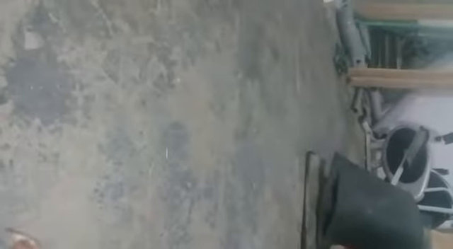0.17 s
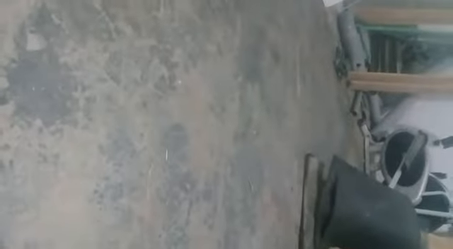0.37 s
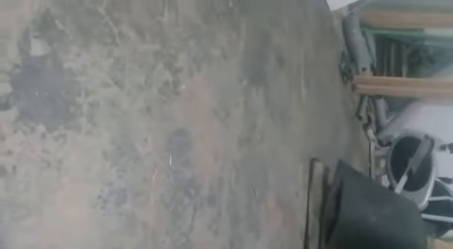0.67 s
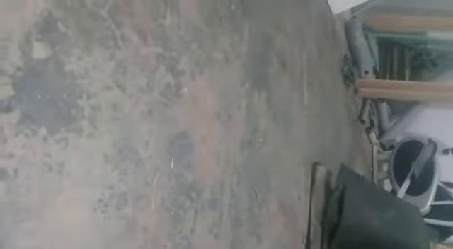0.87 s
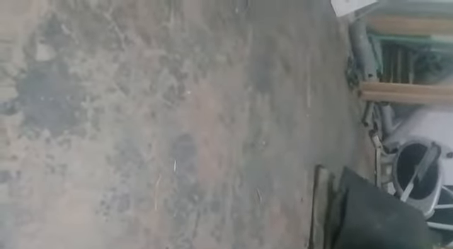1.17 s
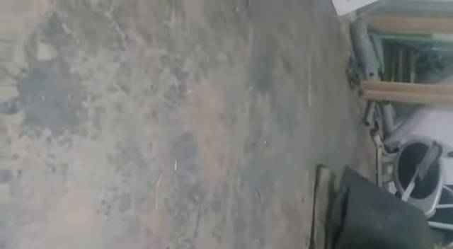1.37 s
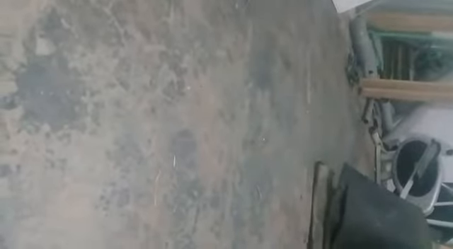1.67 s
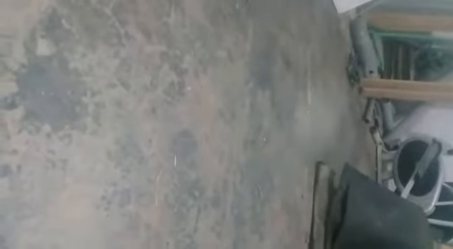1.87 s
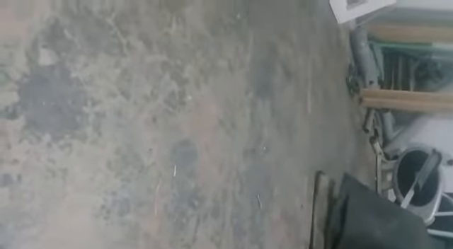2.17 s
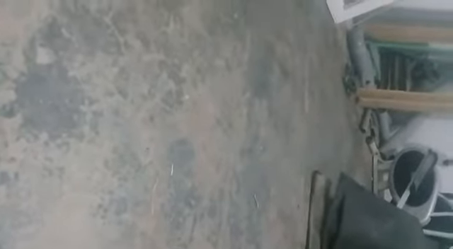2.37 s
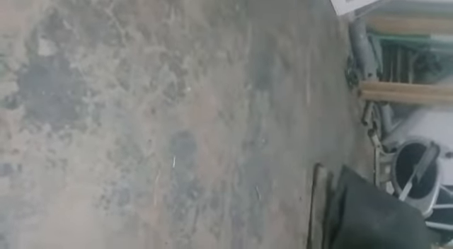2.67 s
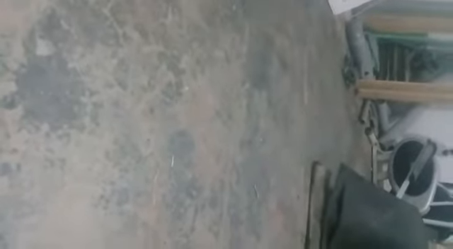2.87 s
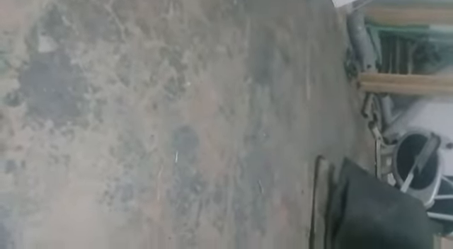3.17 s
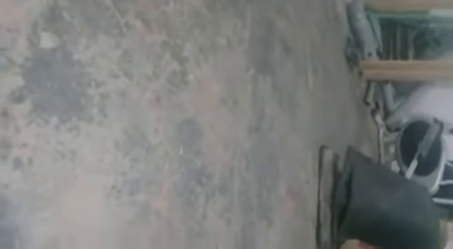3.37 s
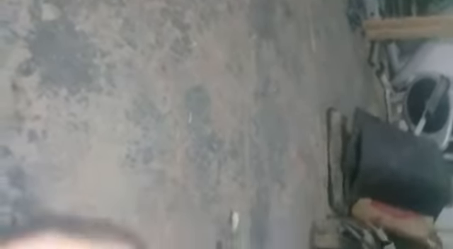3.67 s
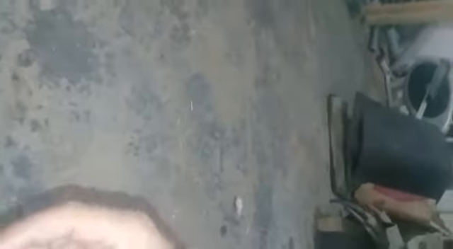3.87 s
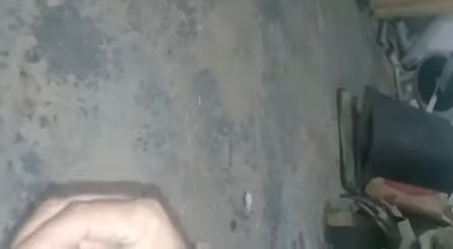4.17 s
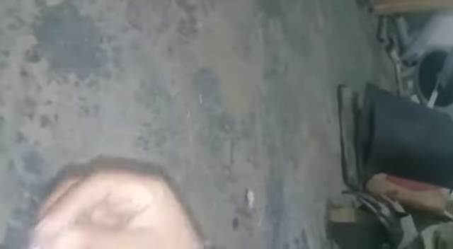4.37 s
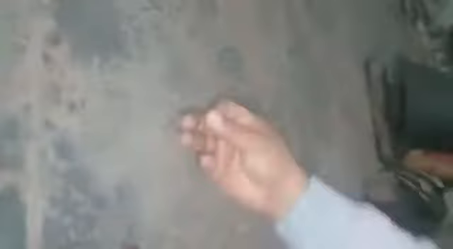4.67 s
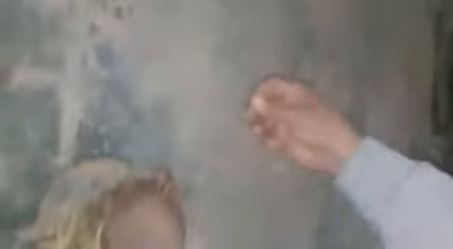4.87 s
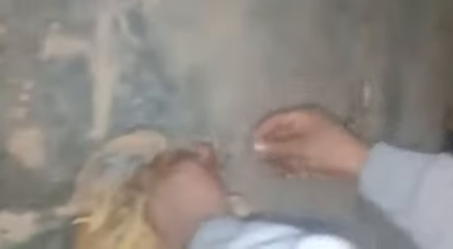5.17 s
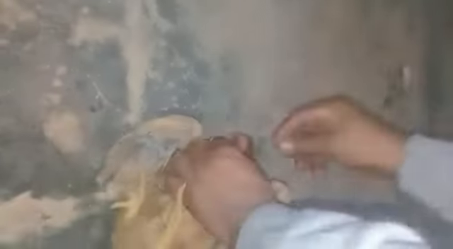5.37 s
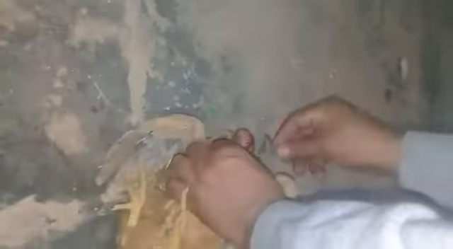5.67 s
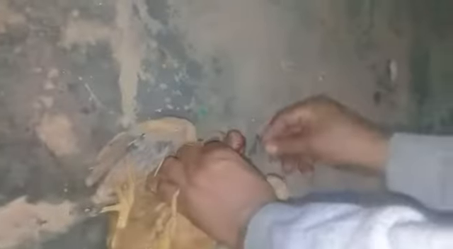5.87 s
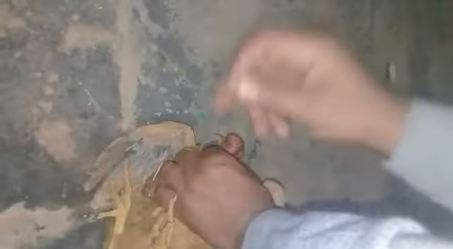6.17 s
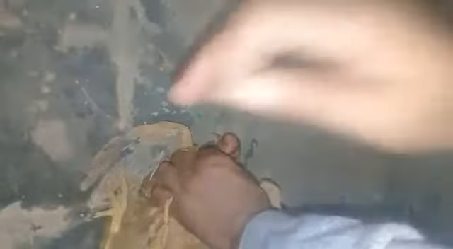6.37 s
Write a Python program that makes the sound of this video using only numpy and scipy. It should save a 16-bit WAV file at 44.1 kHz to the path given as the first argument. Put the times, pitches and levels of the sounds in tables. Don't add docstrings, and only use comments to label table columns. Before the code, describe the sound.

Sharp chirpy squawks and strained whistles from a restrained hen, with feathery scuffling, claw ticks and a faint hollow drone in an echoing room.

```python
import sys
import numpy as np
from scipy import signal
from scipy.fft import rfft, irfft
from scipy.io import wavfile
from scipy.ndimage import uniform_filter1d

SR = 44100
rng = np.random.default_rng(int(sys.argv[2]) if len(sys.argv) > 2 else 0)


def gain_from_decibels(decibels):
    exponent = np.asarray(decibels, float) / 20
    return 10 ** exponent


def output_pcm(signal):
    pcm = np.clip(np.atleast_2d(signal).T, -1, 1) * 32767
    wavfile.write(sys.argv[1], SR, np.round(pcm).astype(np.int16))


N = 287223

TOP_HZ = 16600
HOARSE_FROM_HZ, HOARSE_FULL_HZ = 2900, 3200
PEEP_VOICE = (-33, -5, -90, 0.15)


def rms_one(x):
    return x / np.sqrt(np.mean(x ** 2) + 1e-20)


def at_hz(points, hz):
    point_hz, value = np.array(points).T
    return np.interp(np.log(hz + 1), np.log(point_hz), value)


def in_time(rows):
    s, *columns = np.transpose(rows)
    first = max(round(s[0] * SR), 0)
    t = np.arange(first, min(round(s[-1] * SR), N)) / SR
    return first, [np.interp(t, s, c) for c in columns]


def ramps(length, fade_s):
    n = np.arange(length)
    return np.clip(np.minimum(n, length - n) / (fade_s * SR), 0, 1)


def drift(rate_hz):
    r = np.exp(-2 * np.pi * rate_hz / SR)
    noise = rng.standard_normal(N + SR)
    return rms_one(signal.lfilter([1], [1, -2 * r, r * r], noise)[SR:])


def resonance(x, hz, width_hz):
    r = np.exp(-np.pi * width_hz / SR)
    return signal.lfilter([1, 0, -1], [1, -2 * r * np.cos(2 * np.pi * hz / SR), r * r], x)


def coloured(spectrum):
    hz = np.arange(N // 2 + 1) * SR / N
    return rms_one(irfft(rfft(rng.standard_normal(N)) * gain_from_decibels(at_hz(spectrum, hz)), N))


def bout(s, hold_s, rise_db, fade_db):
    t = np.arange(N) / SR - s
    return gain_from_decibels(np.minimum(rise_db * t, 0) - fade_db * np.maximum(t - hold_s, 0))


def room_floor():
    # (frequency [Hz], level per Hz [dB])
    spectrum = [(15, -36), (25, -3), (55, 4.5), (120, 8.5), (256, -8), (335, -3), (405, -4), (545, -4),
                (1020, -12), (2000, -12.5), (2910, -20), (15500, -24), (16300, -29)]
    return gain_from_decibels(-70) * coloured(spectrum) * gain_from_decibels(0.51 * drift(4.103))


def drone():
    # (start [s], end [s], level [dB], from [Hz], to [Hz])
    swells = [(.001, 0.438, -52, 316.3, 293.3), (0.448, 0.492, -53, 347, 356),
              (1.232, 1.308, -54.5, 331, 345), (1.745, 2.484, -57.5, 345.7, 347),
              (2.96, 3.023, -72.5, 520, 523), (3.97, 4.222, -57.5, 361, 362.6),
              (4.349, 4.552, -65, 352, 358.6), (4.525, 4.65, -54, 348, 352), (4.66, 4.725, -56.5, 352, 353),
              (4.73, 4.83, -54.5, 355, 361), (5.5, 5.66, -66, 149.9, 150), (5.18, 5.24, -68, 170, 170),
              (4.902, 5.353, -67.5, 358, 351.5), (5.501, 5.909, -58.5, 354, 354),
              (5.928, 6.286, -58.5, 346, 362.2), (6.04, 6.45, -73.5, 748, 700.5),
              (6.38, 6.51, -73.5, 355, 335)]
    fade_db_per_s, octave_db = 19.5, -22.5
    out, waver = np.zeros(N), drift(48)
    for s, end, db, from_hz, to_hz in swells:
        end_db = db - fade_db_per_s * (end - s)
        first, (hz, level_db) = in_time([(s, from_hz, db), (end, to_hz, end_db)])
        span = slice(first, first + len(hz))
        phase = 2 * np.pi * np.cumsum(hz) / SR
        tone = np.sin(phase) + gain_from_decibels(octave_db) * np.sin(2 * phase)
        level = gain_from_decibels(level_db + 3.15 * waver[span])
        out[span] += np.sqrt(2) * tone * level * ramps(len(hz), 0.02)
    return out


def scuffle():
    # (time [s], hold [s], feathers [dB], body [dB], fade [dB per s])
    bouts = [(.001, 0.17, -61, -47, 45), (0.445, 0.22, -59.5, -52, 150), (0.863, 0.34, -50.5, -57, 28),
             (1.16, 0.17, -56.5, -43.5, 61), (1.747, 0.0084, -45.5, -36.5, 152),
             (2.066, 0.023, -57.5, -63, 97), (2.437, 0.13, -55, -71, 107), (3.255, 0.032, -45.5, -62, 45),
             (1.617, 0.037, -48, -41, 124), (3.591, 0.0088, -47, -41, 80.5), (3.278, 0.022, -70, -41, 200),
             (1.06, 0.03, -56.5, -47, 150), (3.847, 0.0073, -39, -59, 162.5), (4.566, 0.098, -61, -50, 63),
             (4.618, 0.25, -55, -80, 71)]
    # (frequency [Hz], level per Hz [dB])
    feathers = [(710, -48), (1200, -25), (1380, 5.5), (1470, 2), (1770, 4.5), (2180, 5.5), (2860, -18),
                (4040, -4.5), (4550, -19), (5710, -9), (8630, -20), (12900, -20), (16000, -27)]
    hiss = coloured(feathers) * gain_from_decibels(2.2 * drift(40) + 2.2 * drift(400))
    body = coloured([(300, -33.5), (550, 5), (1250, 7.0), (1800, -30.5)]) * gain_from_decibels(3.0 * drift(25))
    out = np.zeros(N)
    for s, hold_s, hiss_db, body_db, fade_db in bouts:
        struggle = gain_from_decibels(hiss_db) * hiss + gain_from_decibels(body_db - 12.5) * body
        out += bout(s, hold_s, 702, fade_db) * struggle
    return out


def wing_beats():
    # (time [s], level [dB], fade [dB per s])
    beats = [(.001, -40.5, 59.5), (0.479, -52.5, 73.5), (1.05, -61, 16.5), (1.27, -68, 64),
             (1.752, -42, 114.5), (3.27, -63, 80), (3.349, -57.5, 40), (3.73, -76.5, 69),
             (2.031, -68, 40.5), (0.933, -67, 40.5), (4.65, -68, 18.5), (5.331, -76, 68.5),
             (5.52, -68.5, 18), (5.98, -74, 65.5)]
    low_air = [(25, -37), (60, 0.5), (130, 7.0), (300, 5.0), (520, -0.5), (900, -51)]   # (Hz, dB per Hz)
    thump = coloured(low_air) * gain_from_decibels(1.8 * drift(12))
    return thump * sum(gain_from_decibels(db) * bout(s, 0, 298.5, fade_db) for s, db, fade_db in beats)


def snaps():
    # (time [s], peak [dB], time to fall 60 dB [s])
    bursts = [(0.325, -48, 0.016), (0.337, -49.5, 0.21), (0.384, -45, 0.08), (0.4384, -46.5, 0.042),
              (0.4977, -45, 0.041), (0.5077, -39.5, 0.048), (0.574, -46, 0.1), (0.593, -38, 0.02),
              (0.6147, -40, 0.06), (0.6255, -37, 0.17), (0.631, -33, 0.06), (0.845, -50.5, 0.026),
              (0.955, -48.5, 0.044), (0.9933, -36.5, 0.22), (1.048, -27, 0.081), (1.075, -33, 0.036),
              (1.14, -40.5, 0.018), (1.1644, -37.5, 0.09), (1.1847, -38, 0.045), (1.224, -37, 0.19),
              (1.2478, -37, 0.14), (1.3144, -40.5, 0.076), (1.4664, -39, 0.099), (1.588, -45, .1),
              (1.6013, -37, 0.17), (1.6287, -46.5, 0.18), (1.749, -55.5, 0.085), (1.7785, -40.5, 0.17),
              (2.1465, -57, 0.038), (3.5812, -28, 0.3), (3.596, -24, 0.12)]
    out, t = np.zeros(N), np.arange(4000) / SR
    grain_db = 5 * np.clip(rng.standard_normal((len(bursts), 100)), -2, 1.2)
    grains = rng.standard_normal((len(bursts), 4000)) * gain_from_decibels(grain_db.repeat(40, axis=1))
    bright = signal.butter(1, [3400, 10000], "band", fs=SR, output="sos")
    for (s, peak_db, t60), crack in zip(bursts, signal.sosfilt(bright, grains)):
        out[round(s * SR):][:4000] += gain_from_decibels(peak_db - 60 * t / t60) * crack / 2
    return out


def knocks():
    # (time [s], peak [dB], pitch [Hz])
    steps = [(0.993, -46, 2000), (0.625, -52, 830), (1.072, -45, 793), (1.082, -45, 2250), (1.2, -50, 2000),
             (1.139, -41, 950), (1.167, -42, 880), (1.2405, -31, 930), (1.78, -35.5, 350), (1.6, -56, 410),
             (3.597, -39, 900), (3.729, -43.5, 378), (3.745, -52, 420), (3.773, -52, 450),
             (1.056, -44, 2200), (0.455, -55, 680)]
    out, t = np.zeros(N), np.arange(4000) / SR
    dull = signal.butter(2, [300, 2400], "band", fs=SR, output="sos")
    scuffs = signal.sosfilt(dull, rng.standard_normal((len(steps), 4000)))
    for (s, peak_db, hz), noise in zip(steps, scuffs):
        ring = gain_from_decibels(3.5 - 60 * t / 0.032) * np.sin(2 * np.pi * hz * t)
        high_ring = 1.2 * gain_from_decibels(-60 * t / 0.0046) * np.sin(2 * np.pi * 1.305 * hz * t)
        scuff = 2.3 * gain_from_decibels(-60 * t / 0.036) * noise
        out[round(s * SR):][:4000] += gain_from_decibels(peak_db) * (ring + high_ring + scuff)
    return out


def ticks():
    # (time [s], peak [dB], pitch [Hz])
    early = [(0.326, -43, 5000), (0.3375, -43, 6500), (0.3835, -41, 6340), (0.389, -44, 7500),
             (0.4385, -46, 5000), (0.4935, -43, 8000), (0.5725, -46, 6800), (0.5905, -41, 7500),
             (0.6135, -45, 7000), (0.618, -36, 8500), (0.6253, -29, 7000), (0.6305, -31, 8800),
             (0.635, -36, 6000), (1.049, -32, 5840), (1.076, -31, 2500), (1.139, -42, 6390)]
    late = [
        (3.583, -28, 5700),
        (3.5935, -22, 10500),
        (3.598, -20, 7500),
        (3.621, -26, 4200),
    ]
    out, t = np.zeros(N), np.arange(400) / SR
    for s, peak_db, hz in early + late:
        ring = np.sin(2 * np.pi * hz * t) + 0.6 * np.sin(2 * np.pi * 1.45 * hz * t)
        out[round(s * SR):][:400] += gain_from_decibels(peak_db - 1.5 - 60 * t * hz / 9.0) * ring
    return out


def gasps():
    # (time [s], hold [s], level [dB], rise [dB per s], fade [dB per s])
    breaths = [
        (3.197, .02, -68, 149, 103),
        (3.597, 0.004, -35, 800, 450),
        (3.62, .012, -44, 600, 700),
        (4.675, 0.074, -54.5, 154.5, 70),
        (5.128, 0.096, -66, 49.5, 160),
    ]
    # (frequency [Hz], level per Hz [dB])
    spectrum = [(1500, -31.5), (3000, -1), (6000, 2.2), (9000, -6.5), (13500, -4.5), (16000, -10)]
    air = coloured(spectrum) * gain_from_decibels(0.79 * drift(27))
    return air * sum(gain_from_decibels(db) * bout(s, hold_s, rise_db, fade_db)
                     for s, hold_s, db, rise_db, fade_db in breaths)


def rasp():
    # (start [s], end [s], level [dB], main resonance [Hz], upper resonances [dB])
    bursts = [(.001, 0.12, -58.5, 1690, -29), (0.625, 0.656, -48, 2005, -16), (0.84, 0.92, -49, 3480, -8),
              (0.84, 0.96, -55, 1560, -12), (0.848, 0.896, -53, 4700, -20), (1.298, 1.317, -45, 2060, -13),
              (1.509, 1.529, -29, 1534, -38), (2.118, 2.318, -60, 980, -30.5),
              (2.574, 2.694, -64, 1060, -23), (3.85, 3.909, -35, 1630, -27.5),
              (2.032, 2.121, -38, 1587, -17), (2.405, 2.562, -35, 1754, -20.5),
              (3.232, 3.251, -24.5, 2500, -25), (3.245, 3.349, -37.5, 2080, -18),
              (3.241, 3.302, -51, 9700, -12), (3.306, 3.36, -53, 8000, -8.5),
              (3.41, 3.455, -32, 2900, -17.5), (3.585, 3.677, -46, 2170, -11),
              (3.639, 3.728, -47.5, 3940, -25), (3.828, 3.866, -27.5, 3180, -19),
              (4.527, 4.72, -45, 2100, -16), (4.56, 4.713, -53, 2930, -12), (4.58, 4.76, -57.5, 4800, -15),
              (4.552, 4.737, -63, 9650, -15), (4.55, 4.72, -64.5, 8000, -15),
              (4.522, 4.704, -50, 4000, -19), (4.725, 4.77, -42, 1980, -16), (4.738, 4.79, -44, 1400, -24),
              (5.08, 5.326, -73, 2070, -2), (5.837, 6.113, -82.5, 2075, -2)]
    # (frequency [Hz], width [Hz], level [dB])
    windpipe = (2150, 260, -4)
    # (frequency [Hz], width [Hz], level [dB])
    beak = [(3800, 1200, -7), (4870, 680, -13), (6050, 470, -12.5), (11140, 600, -12)]
    main_width_hz, throbs_per_s = 360, 250
    out, uneven = np.zeros(N), drift(39)
    for s, end, level_db, main_hz, upper_db in bursts:
        first, length = round(s * SR), round((end - s) * SR)
        span = slice(first, first + length)
        throb = np.sin(np.pi * np.cumsum(throbs_per_s * gain_from_decibels(1.1 * uneven[span])) / SR) ** 4
        air = rng.standard_normal(length) * (0.52 + throb)
        main = (main_hz, main_width_hz * max(1, main_hz / 1500), 0)
        upper = [(hz, width_hz, db + upper_db) for hz, width_hz, db in beak]
        for hz, width_hz, db in [main, windpipe] + upper:
            rung = resonance(resonance(air, hz, 0.59 * width_hz), hz, 0.59 * width_hz)
            out[span] += gain_from_decibels(level_db + db) * rms_one(rung) * ramps(length, 0.0075)
    return out


def dipping_peeps():
    # (time [s], half length [s], level [dB], lowest pitch [Hz])
    dips = [
        (1.191, 0.0077, -38, 2450),
        (1.323, 0.0077, -24, 2120),
        (1.696, 0.0057, -24.5, 2063),
        (1.719, 0.0037, -26.5, 2007),
        (1.774, 0.01, -21, 1997),
        (1.795, 0.0056, -27.5, 1973),
        (1.669, .006, -36, 2030),
    ]
    for s, half, db, hz in dips:
        u = np.linspace(-1, 1, round(2 * half * SR))
        pitch = hz * np.interp(u, [-1, 0, 1], [1.15, 1, 1.07])
        yield round((s - half) * SR), pitch, db - 16 * u ** 2, *PEEP_VOICE


def gliding_peeps():
    # (time [s], half length [s], level [dB], from [Hz], to [Hz])
    glides = [(0.842, 0.0055, -54, 4250, 4040), (1.184, 0.0073, -49.5, 6917, 5510),
              (1.202, .006, -43, 2143, 1800), (1.343, 0.0072, -31, 2508, 1204),
              (1.506, 0.0064, -16.5, 1522, 1431), (1.764, 0.0045, -47.5, 3510, 2330),
              (2.027, 0.0084, -32.5, 1953, 2515), (2.107, .013, -22, 2370, 1792),
              (2.119, 0.0072, -46, 1049, 970), (2.395, 0.0091, -25, 1870, 2334),
              (2.582, 0.0057, -15, 2219, 2017), (2.591, 0.0059, -20.5, 2078, 2311),
              (2.5977, 0.0035, -24.5, 2261, 2140), (2.604, .0055, -19, 2180, 1864),
              (3.206, .003, -52, 2150, 2140), (3.216, .005, -32.5, 1702, 2057),
              (3.2242, 0.0054, -17, 2130, 2453), (3.231, 0.0059, -21.5, 2460, 2592),
              (3.4365, .0045, -11, 2560, 1800), (3.441, .003, -19, 1800, 1680),
              (3.446, .007, -19.5, 1644, 2230), (3.457, 0.0029, -17.5, 2345, 2065)]
    for s, half, db, from_hz, to_hz in glides:
        u = np.linspace(-1, 1, round(2 * half * SR))
        yield round((s - half) * SR), np.linspace(from_hz, to_hz, len(u)), db - 18 * u ** 4, *PEEP_VOICE


def whistles():
    # (time [s], pitch [Hz], level [dB])
    early = [
        [(.852, 3750, -45), (.865, 3845, -30), (.876, 4015, -36), (.889, 3965, -32.5), (.896, 3964, -33.5),
         (.9, 3960, -45.5), (.935, 3900, -39), (.965, 3980, -45.5)],
        [(1.464, 3675, -47.5), (1.471, 2600, -51), (1.475, 2190, -18.5), (1.481, 2410, -24),
         (1.487, 2500, -31.5), (1.494, 2324, -21), (1.5, 2087, -16), (1.503, 1850, -23.5)],
        [(1.61, 3460, -63.5), (1.622, 3800, -61), (1.633, 3510, -57.5), (1.641, 2850, -58), (1.65, 3390, -55),
         (1.66, 3370, -52), (1.668, 2820, -61.5)],
        [(2.036, 3200, -67), (2.052, 3850, -61), (2.068, 3550, -56), (2.086, 3600, -57.5), (2.094, 2320, -51)],
        [(2.402, 3080, -60), (2.415, 3380, -62), (2.44, 3560, -51.5), (2.47, 3576, -48), (2.51, 3425, -48),
         (2.535, 3530, -47.5), (2.548, 3340, -43), (2.568, 3350, -43), (2.577, 2700, -48)],
        [(3.24, 2896, -38), (3.255, 3230, -33), (3.275, 3330, -36.5), (3.293, 3410, -40), (3.305, 3520, -29.5),
         (3.322, 3634, -26), (3.336, 3396, -27), (3.34, 3380, -38)],
    ]
    late = [
        [(3.34, 3420, -35.5), (3.35, 3296, -24.5), (3.36, 3220, -31.5), (3.372, 3060, -29), (3.384, 3014, -23),
         (3.39, 2880, -17), (3.4, 2780, -14), (3.408, 2720, -17), (3.412, 2640, -25)],
        [(3.411, 2620, -26), (3.415, 2604, -17), (3.42, 2610, -18), (3.423, 2600, -27), (3.426, 2597, -19),
         (3.429, 2600, -29), (3.433, 2560, -21)],
        [(3.655, 2690, -36.5), (3.69, 2890, -32), (3.718, 3200, -33), (3.734, 3138, -31), (3.739, 3032, -21.5),
         (3.748, 3006, -28), (3.752, 3194, -32), (3.767, 3185, -30), (3.77, 3100, -40)],
        [(3.769, 3065, -38), (3.776, 3065, -29), (3.782, 3065, -37), (3.79, 3058, -31), (3.81, 3055, -33),
         (3.82, 3058, -33), (3.827, 3020, -23.5), (3.832, 2880, -30)],
        [(3.829, 1501, -46.5), (3.836, 1151, -57), (3.843, 910, -52.5), (3.852, 822, -47.5), (3.862, 745, -39),
         (3.872, 793, -55.5), (3.89, 808, -61)],
        [(4.521, 1765, -48), (4.531, 2325, -43), (4.543, 3000, -44.5), (4.56, 3523, -40.5), (4.6, 3720, -43.5),
         (4.64, 3800, -42), (4.668, 3827, -36.5), (4.692, 3775, -41)],
        [(4.69, 3746, -43), (4.705, 3300, -36.5), (4.72, 2710, -33.5), (4.733, 1898, -34.5), (4.742, 1478, -33),
         (4.75, 1350, -37.5)],
    ]
    overtones_db = [-27, -24.5, -5, 2, -4.5, -18.5, -21, -22, -15.5, -14, 23, -22.5, -24]
    tilts_db = [-5, 0, 1, -4, -8.5, 0.5, 0.55, 1.1, 1, 0.5, -4, -9, -9]
    halves_db = [-43, -58.5, -60, -29, -40, -27.5, -26.5, -50, -40.5, -40, -58, -60, -60]
    hoarseness = [.2, .2, .3, .3, .14, .14, .22, .2, .16, .07, .15, .32, .25]
    follows = 0.54
    voices = zip(early + late, overtones_db, tilts_db, halves_db, hoarseness)
    for rows, mean_over_db, tilt_db, half_db, hoarse in voices:
        first, (hz, db) = in_time(rows)
        over_db = mean_over_db - (1 - follows) * (db - db.mean())
        over_db = over_db + 5 * np.log2(hz / np.median(hz))
        yield first, hz, db, over_db, tilt_db, half_db, hoarse


def cries():
    # (multiple of the pitch, level [dB])
    overtones = [(2, -8.5), (3, -10), (4, -17), (5, -25)]
    # (time [s], direct sound over what the room receives [dB])
    head = [(.9, 3), (1.19, 2.5), (1.32, 5), (1.345, 6.5), (1.5, 0.6), (1.7, -0.5), (1.77, 12.5),
            (1.8, -4.5), (2.1, 5), (2.6, 4.5), (3.3, 1.5), (3.75, -9), (4.6, -4.5)]
    direct, sent = np.zeros(N), np.zeros(N)
    wobble, shimmer, patches = drift(67), drift(110), drift(45)
    sideband = signal.butter(4, 318.3, fs=SR, output="sos")
    flutter = rms_one(signal.sosfilt(sideband, rng.standard_normal(N)))
    calls = [*dipping_peeps(), *gliding_peeps(), *whistles()]
    for first, hz, level_db, over_db, tilt_db, half_db, hoarse in calls:
        span = slice(first, first + len(hz))
        level_db = uniform_filter1d(level_db, size=90, mode="nearest")
        forced = np.clip((hz - HOARSE_FROM_HZ) / (HOARSE_FULL_HZ - HOARSE_FROM_HZ), 0.01, 1)
        rough = hoarse * forced
        shaky_hz = hz * (1 + 0.015 * (rough + hoarse) * wobble[span])
        phase = 2 * np.pi * np.cumsum(shaky_hz) / SR
        over = 0
        for k, db in overtones:
            patchy_db = 9 * np.sqrt(hoarse) * np.roll(patches, k * SR // 7)[span]
            over = over + gain_from_decibels(db + tilt_db * (k - 2) + patchy_db) * np.sin(k * phase) * (k * hz < TOP_HZ)
        half = 0
        for k in (1, 2, 3):
            half = half + gain_from_decibels(6 * np.roll(patches, k * SR // 5)[span]) * np.sin((k + 0.5) * phase)
        tone = np.sin(phase) + gain_from_decibels(over_db) * over + gain_from_decibels(half_db) * forced * half
        opening = np.sqrt(1 - rough) * gain_from_decibels(5 * rough * shimmer[span]) + np.sqrt(rough) * flutter[span]
        cry = np.sqrt(2) * gain_from_decibels(level_db) * ramps(len(hz), 0.003) * opening * tone
        direct_db = np.interp(first / SR, *np.transpose(head))
        if np.median(hz) > HOARSE_FULL_HZ:
            direct_db -= 4.5
        direct[span] += cry
        sent[span] += cry / gain_from_decibels(direct_db)
    return direct, sent


def room(x):
    # (frequency [Hz], time to fall 60 dB [s])
    ring_times = [(150, 0.32), (700, 0.58), (2000, 0.78), (3500, 0.78), (7000, .58), (14000, 0.42)]
    gap_s = 0.0062
    t, tail = np.arange(round(1.3 * SR)) / SR, 0
    band_hz = 70 * 2 ** np.arange(0, 8.1, 0.5)
    white = rng.standard_normal((2, len(t)))
    for k, (low, high) in enumerate(zip(band_hz, band_hz[1:])):
        half_octave = signal.butter(2, [low, high], "band", fs=SR, output="sos")
        band = signal.sosfilt(half_octave, white[k % 2])
        tail = tail + band * gain_from_decibels(-60 * t / at_hz(ring_times, np.sqrt(low * high)))
    tail = tail * np.clip(t / gap_s - 1, 0, 1) * np.sqrt(np.log(1e6) / SR)
    return gain_from_decibels(-5) * signal.fftconvolve(x, tail)[:N]


def scene():
    direct, sent = cries()
    throat = rasp()
    moving = scuffle() + wing_beats() + snaps() + knocks() + ticks() + gasps()
    ringing = room(sent + throat + gain_from_decibels(-1.5) * moving)
    return (direct + throat + moving + ringing + drone() + room_floor())[None]


def top_cut(x):
    return signal.sosfilt(signal.butter(12, 16650, fs=SR, output="sos"), x)


def record(dry):
    low_pass = signal.cheby2(12, 70, TOP_HZ, fs=SR, output="sos")
    mix = signal.sosfilt(low_pass, dry)
    return top_cut(mix)


dry = scene()
out = record(dry)
output_pcm(out)
```